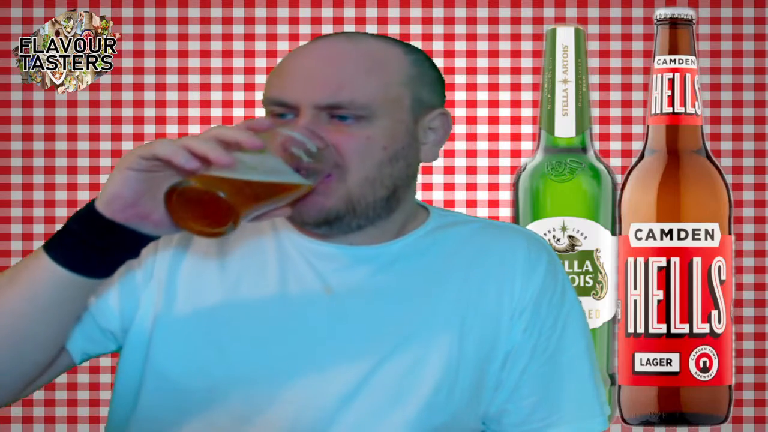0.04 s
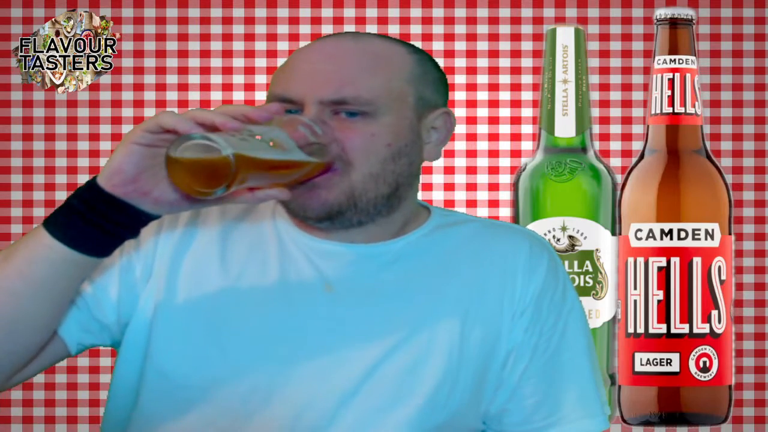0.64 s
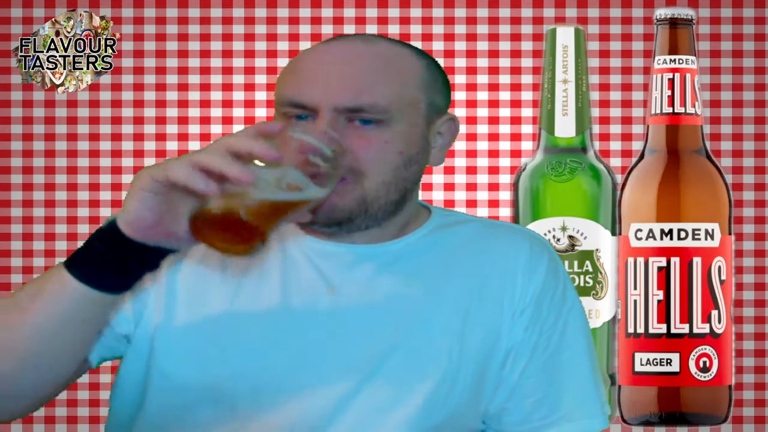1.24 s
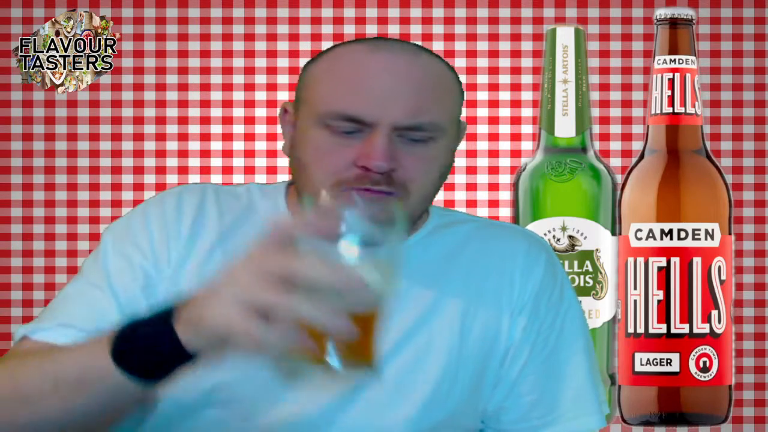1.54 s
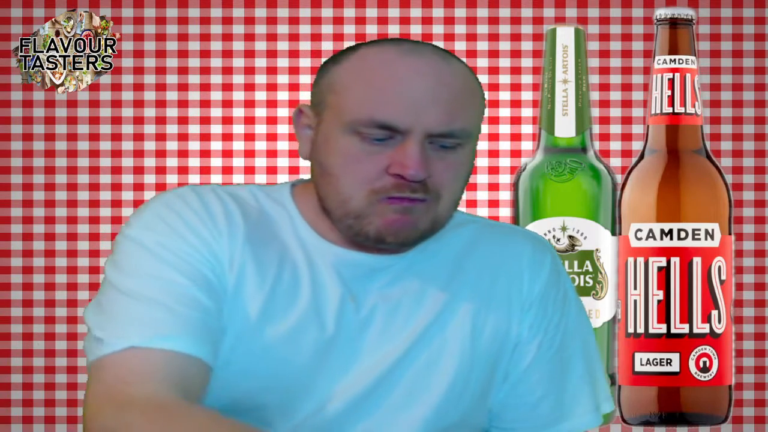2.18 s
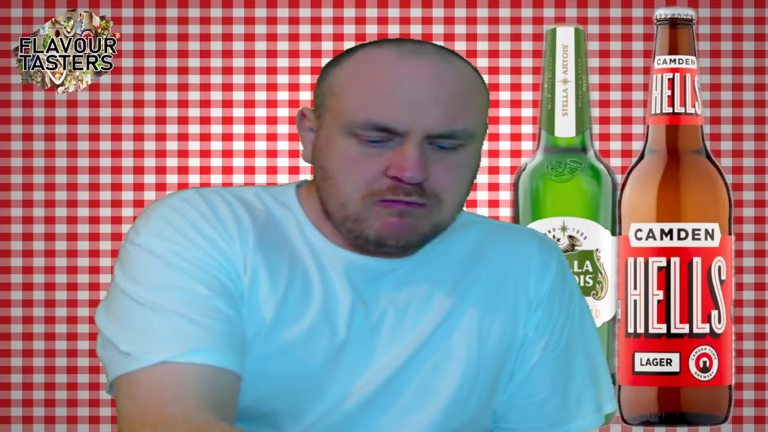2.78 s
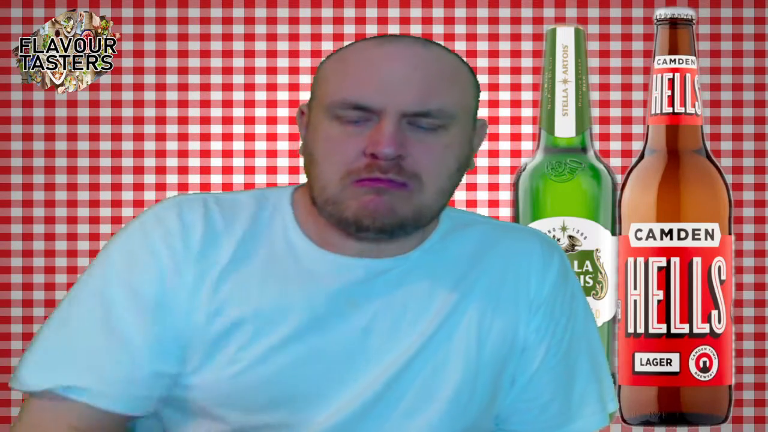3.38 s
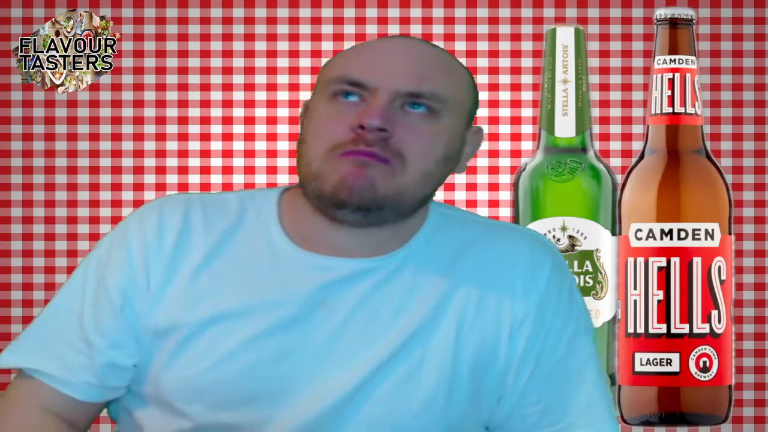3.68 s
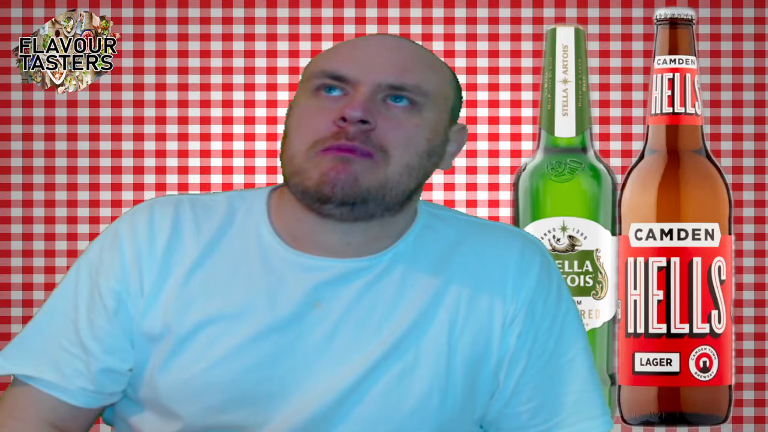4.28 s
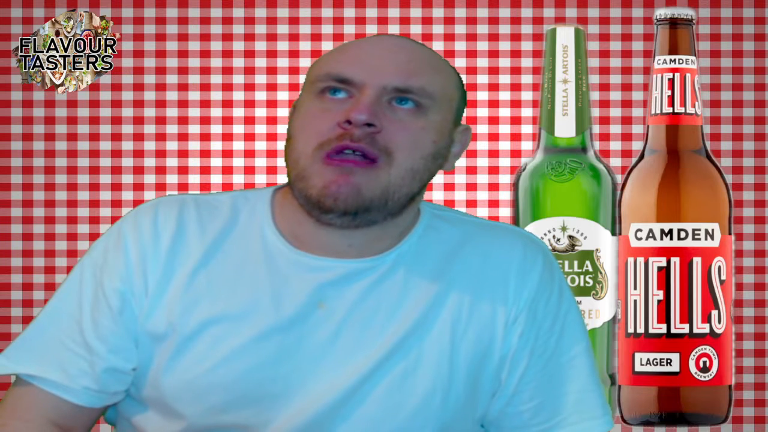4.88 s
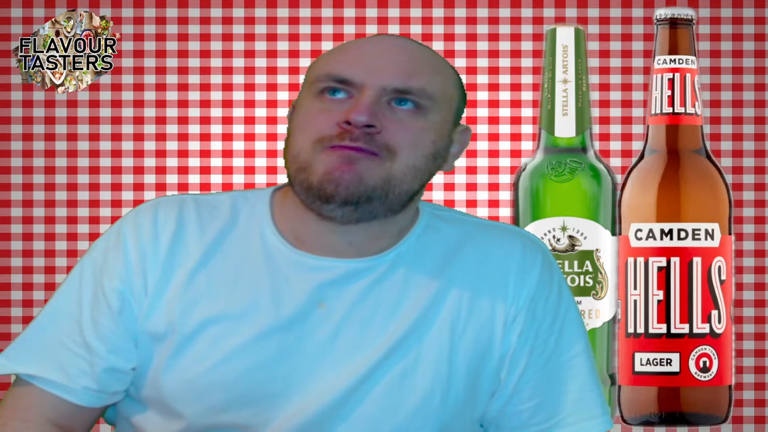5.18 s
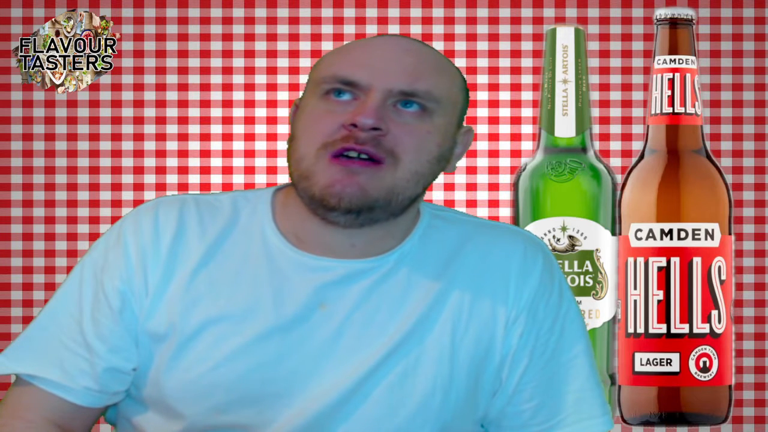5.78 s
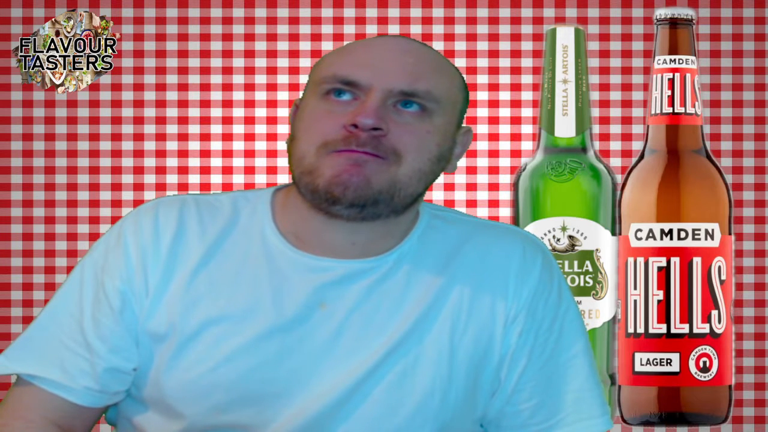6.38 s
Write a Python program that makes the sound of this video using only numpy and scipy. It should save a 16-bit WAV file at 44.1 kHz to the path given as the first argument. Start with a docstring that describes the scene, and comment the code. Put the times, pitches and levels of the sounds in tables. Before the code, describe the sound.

A drinking glass knocks down on a desk over a steady fan hum, followed by soft bumps and tiny lip smacks.

```python
"""A computer fan hums in a small room throughout, with a thin whine from the microphone's electronics.
Early on a faint low drone swells three times, the lips tick, and soft bumps touch the desk that carries
the microphone. At 2.7 s a part-filled drinking glass is set down: its base lands, slaps flat and rocks,
the glass rings briefly and the desk top booms on with a slow beat. The glass sings faintly as the fingers
slip off; more bumps and a sliding shirt follow, then tiny lip ticks and a few hollow pops."""
import sys
import numpy as np
from scipy import signal
from scipy.fft import irfft
from scipy.io import wavfile

SR = 44100
rng = np.random.default_rng(int(sys.argv[2]) if len(sys.argv) > 2 else 0)


def to_wav(s):
    """Save 16-bit WAV."""
    ch = np.atleast_2d(s).T  # columns
    pcm = np.round(np.clip(ch, -1, 1) * 32767)  # PCM
    wavfile.write(sys.argv[1], SR, pcm.astype(np.int16))


N = 283871
TIME = np.arange(N) / SR

# Air through the fan, over microphone hiss. Each row: frequency in Hz, relative density in dB.
FAN_AIR = [(25, 5.5), (65, -2.5), (100, -4), (145, 2.5), (205, -3.5), (285, 3.5), (370, -6.5), (490, -5),
           (1100, -17), (1600, -7), (2050, -13.5), (2600, -27), (3050, -29), (3600, -24), (4700, -30.5),
           (10000, -36), (16000, -38.5)]
# Fan and mains tones. Each row: frequency in Hz, rms level in dB.
FAN_TONES = [(36.8, -74.5), (87.3, -71.5), (119.8, -62.5), (144.3, -60), (175.5, -69.5), (218, -79),
             (252.1, -53.5), (260.5, -68), (286, -68.5), (756.3, -74), (1561, -83), (1750, -76.5)]
# Thin electrical whine. Each row: frequency in Hz, rms level in dB.
WHINE_TONES = [(1000, -82), (2000, -80.5), (3000, -99), (4000, -94), (5000, -97.5), (6000, -92.5),
               (8000, -97.5)]
# Contour of the electrical buzz. Each row: frequency in Hz, rms level of a harmonic there in dB.
BUZZ_CONTOUR = [(1000, -87), (1500, -80), (2100, -81), (2300, -87.5), (2500, -108), (3200, -108),
                (3550, -90), (3900, -101), (5000, -106)]
# Swells of the low drone. Each row: start and length in seconds, held rms level in dB, pitch in Hz.
DRONE_SWELLS = [(.23, 0.34, -57, 79), (.59, 0.37, -58, 77), (1.02, 0.34, -53.5, 80.5)]
# Wet ticks of the lips. Each row: start in seconds, level in dB, centre frequency in Hz.
LIP_TICKS = [(0.296, -68.5, 6530), (1.9662, -66, 5500), (4.872, -61.5, 4100), (5.4926, -57.5, 3870),
             (5.55, -59.5, 2900), (5.6768, -50.5, 8200), (5.712, -57, 5500), (5.7483, -57, 8240),
             (5.764, -66, 7500), (5.785, -65, 7500), (5.8147, -59, 2940)]
# Colour of one tick. Each row: ratio to its centre frequency, relative density in dB.
TICK_SPECTRUM = [(.25, -27), (.55, -13), (1, 2), (1.4, -15), (2, -12.5), (3, -26)]
# Soft bumps on the desk. Each row: start in seconds, strength in dB, brightness in Hz, boom gain in dB.
DESK_BUMPS = [(2.095, -26.5, 690, -50), (2.114, -42, 403, -38.5), (2.2546, -35.5, 9100, -49),
              (2.2591, -22, 724, -41), (2.281, -26, 600, -50), (2.8329, -31, 300, -18),
              (3.148, -30.5, 446, -30.5), (3.189, -26, 512, -52), (3.260, -17, 300, -30),
              (3.284, -20.5, 480, -50), (3.309, -23.5, 595, -42), (5.359, -30, 420, -36),
              (5.405, -30, 415, -46)]
# Ring of the hand-damped glass and the board under it.
# Each row: frequency in Hz, relative level in dB, time to fall 60 dB in seconds.
RING_MODES = [(386, -29, .1), (436, -29, .17), (542, -27, .19), (716, -29, .12), (800, -25, .13),
              (991, -30, .13), (1060, -23, .12), (1129, -33, .22), (1212, -30, .13), (1400, -20, .115),
              (1531, -30, .18), (1567, -26, .11), (1644, -23, .11), (1850, -30, .11), (2000, -24, .09),
              (2319, -30, .16), (2412, -33, .14), (2659, -35, .16), (2780, -33, .12), (3380, -40, .12),
              (3950, -42, .12), (5175, -43, .12), (6400, -49, .13), (7675, -52, .14)]
# Bending modes of the desk top and what stands on it.
# Each row: frequency in Hz, relative level in dB, time to fall 60 dB in seconds.
DESK_MODES = [(47.4, -33, 0.96), (58, -19, 0.12), (72.66, -20.5, 0.75), (80.4, -22, 0.7),
              (96.4, -27.5, 0.67), (130.5, -33.5, 0.48), (140.5, -22.5, 0.582), (140.7, -14.5, 0.13),
              (156, -19, 0.25), (282.5, -27, 0.13)]
# Dense, short-lived modes between the ringing ones. Each row: frequency in Hz, relative density in dB.
CRACK_SPECTRUM = [(150, -1), (300, 3), (520, 5.5), (900, -1), (1600, 1.5), (2400, -2.5), (3200, -11.5),
                  (4100, -11.5), (4700, -21.5), (7500, -18), (10500, -35), (16000, -55)]
# The glass base lands, slaps and rocks. Each row: start in seconds, strength in dB, brightness in Hz.
GLASS_CONTACTS = [(2.7122, 0, 900), (2.7146, 1, 12000), (2.7208, -6, 11000)]
# Strokes of the shirt as the arm draws back, then small shifts.
# Each row: peak time in seconds, peak rms level in dB, rise and fall in seconds.
SHIRT_STROKES = [(3.53, -70, .26, .1), (3.55, -60, 0.022, 0.047), (3.625, -66, .03, 0.057),
                 (3.81, -69, 0.11, 0.094), (4.335, -71.5, .025, .04), (5.485, -67.5, 0.054, 0.043)]
# Hiss of rubbing cloth. Each row: frequency in Hz, relative density in dB.
CLOTH_SPECTRUM = [(1200, -17.5), (2800, -2.5), (3400, -8), (5800, -0.5), (8200, -3.5), (10500, -13),
                  (16000, -15)]
# Soft hollow pops. Each row: start in seconds, gain in dB.
HOLLOW_POPS = [(5.838, -59), (5.854, -47.5), (5.864, -48.5), (5.897, -51.5)]
# Resonances of a pop. Each row: frequency in Hz, relative level in dB, time to fall 60 dB in seconds.
POP_MODES = [(616, 3, 0.01), (1200, 3, 0.024), (2800, -13.5, 0.044)]
# Reverb of the small room. Each row: frequency in Hz, time to fall 60 dB in seconds.
ROOM_DECAY = [(150, 0.25), (500, 0.35), (1500, 0.33), (3000, 0.26), (7000, 0.25), (14000, 0.22)]


def from_db(db):
    """Decibels to gain."""
    return 10 ** (np.asarray(db) / 20)


def rms_one(x):
    """Scale to rms 1."""
    return x / np.sqrt(np.mean(x ** 2) + 1e-20)


def at_hz(points, hz):
    """Read a table on a log-frequency axis."""
    known_hz, values = np.transpose(points)
    return np.interp(np.log(np.maximum(hz, 1)), np.log(known_hz), values)


def noise(spectrum, size=N):
    """Noise of a given colour, rms 1."""
    hz = np.arange(size // 2 + 1) * SR / size
    phasors = np.exp(2j * np.pi * rng.random(len(hz)))
    return rms_one(irfft(phasors * from_db(at_hz(spectrum, hz)), size))


def drift(rate_hz):
    """A slow random wander, rms 1."""
    return rms_one(np.interp(TIME * rate_hz, np.arange(1024), rng.standard_normal(1024)))


def tone(hz, offset_cycles=0):
    """A sine as long as the scene, rms 1."""
    return rms_one(np.sin(2 * np.pi * (hz * TIME + offset_cycles)))


def decay(t60):
    """One second of an envelope that falls 60 dB in t60 seconds."""
    return np.exp(-np.log(1000) * TIME[:SR] / t60)


def swell(peak_s, rise_s, fall_s, roundness=1.3):
    """A rubbing stroke gathers speed, peaks at 1 and slows; roundness 1 is pointed, 2 a bell shape."""
    distance = np.maximum((peak_s - TIME) / rise_s, (TIME - peak_s) / fall_s)
    return np.exp(-np.minimum(np.abs(distance) ** roundness, 20))


def struck(modes):
    """Modes ring after a blow; neighbours swing against each other and beat."""
    return sum((-1) ** k * from_db(db) * np.sin(2 * np.pi * hz * TIME[:SR]) * decay(t60)
               for k, (hz, db, t60) in enumerate(modes))


def soften(x, bright_hz):
    """A softer contact lasts longer and loses its treble."""
    return signal.sosfilt(signal.butter(2, bright_hz, fs=SR, output="sos"), x + 1e-18)


def add(track, start_s, sound):
    """Mix a sound in at its cue."""
    start = round(start_s * SR)
    track[start:start + len(sound)] += sound[:N - start]


def room(x, wet_db, build_s):
    """Direct sound plus a diffuse tail that builds up and dies sooner in the treble."""
    edges_hz = np.geomspace(200, 16000, 10)
    tail = np.zeros(SR)
    for low, high in zip(edges_hz, edges_hz[1:]):
        bandpass = signal.butter(2, [low, high], "band", fs=SR, output="sos")
        band = signal.sosfilt(bandpass, rng.standard_normal(SR))
        tail += band * decay(at_hz(ROOM_DECAY, np.sqrt(low * high)))
    tail *= 1 - np.exp(-(TIME[:SR] / build_s) ** 2)
    reverb = signal.fftconvolve(x, rms_one(tail) / np.sqrt(SR))[:N]
    return x + from_db(wet_db) * reverb


def fan(air_db=-58.5, waver_db=0.3, wander_rad=0.2):
    """Fan and mains tones waver slightly over a bed of rushing air."""
    out = from_db(air_db) * noise(FAN_AIR)
    for hz, db in FAN_TONES:
        phase = 2 * np.pi * (hz * TIME + rng.random()) + wander_rad * drift(rate_hz=2.46)
        gain = from_db(db + waver_db * drift(rate_hz=4.9))
        out += gain * rms_one(np.sin(phase))
    return out


def whine(buzz_hz=100):
    """The microphone's electronics add faint steady tones and a thin buzz."""
    harmonics_hz = buzz_hz * np.arange(11, 45)
    buzz = [(hz, at_hz(BUZZ_CONTOUR, hz)) for hz in harmonics_hz if hz % 1000]   # whole kHz are the whine's
    return sum(from_db(db) * tone(hz, rng.random()) for hz, db in WHINE_TONES + buzz)


def drone(fade_s=0.084):
    """A faint low tone swells three times: each fades in, holds its pitch and fades out."""
    out = np.zeros(N)
    for start_s, length_s, db, hz in DRONE_SWELLS:
        inside_s = np.minimum(TIME - start_s, start_s + length_s - TIME)
        fade = np.clip(inside_s / fade_s, 0, 1)
        out += from_db(db) * fade * tone(hz)
    return out


def lip_ticks(t60=0.03):
    """Wet lips make tiny bright bursts of noise, each around its own pitch."""
    out = np.zeros(N)
    for start_s, db, centre_hz in LIP_TICKS:
        colour = [(ratio * centre_hz, level) for ratio, level in TICK_SPECTRUM]
        add(out, start_s, from_db(db) * noise(colour, size=SR) * decay(t60))
    return out


def crack(bright_hz, gain_db=-17, t60=0.076):
    """The attack of a contact: a mass of dense modes that die almost at once."""
    burst = noise(CRACK_SPECTRUM, size=SR) * decay(t60)
    return from_db(gain_db) * soften(burst, bright_hz)


def bumps(ring_db=-5):
    """Light touches on the desk: each a dull knock, a muffled ring and a low boom."""
    knocks, rings = np.zeros(N), np.zeros(N)
    ring, boom = struck(RING_MODES), struck(DESK_MODES)
    for start_s, db, bright_hz, boom_db in DESK_BUMPS:
        add(knocks, start_s, from_db(db) * crack(bright_hz))
        add(rings, start_s, from_db(db + ring_db) * soften(ring, bright_hz))
        add(rings, start_s, from_db(boom_db) * boom)
    return room(knocks, wet_db=-9.0, build_s=0.0045) + rings


def glass(ring_db=2.0, boom_db=0.8):
    """The edge of the base lands first, then the whole base slaps down and rocks once."""
    cracks = np.zeros(N)
    for start_s, db, bright_hz in GLASS_CONTACTS:
        add(cracks, start_s, from_db(db) * crack(bright_hz))
    out = room(cracks, wet_db=-9.0, build_s=0.0072)
    land_s, slap_s = GLASS_CONTACTS[0][0], GLASS_CONTACTS[1][0]
    add(out, land_s, from_db(boom_db) * struck(DESK_MODES))   # the weight arrives with the first touch
    add(out, slap_s, from_db(ring_db) * struck(RING_MODES))   # the hard slap sets the glass ringing
    return out


def finger_slip(level_db=-78.5):
    """Fingers slipping off the glass rub one of its modes into a brief, faint tone."""
    return from_db(level_db) * swell(peak_s=3.1, rise_s=0.025, fall_s=0.06) * tone(hz=2783)


def shirt():
    """Fine fibres rub into a smooth bright hiss; overlapping strokes add in power."""
    power = sum((from_db(db) * swell(peak_s, rise_s, fall_s)) ** 2
                for peak_s, db, rise_s, fall_s in SHIRT_STROKES)
    return np.sqrt(power) * noise(CLOTH_SPECTRUM)


def pops():
    """Soft hollow pops, each three resonances that die quickly."""
    out = np.zeros(N)
    for start_s, db in HOLLOW_POPS:
        add(out, start_s, from_db(db) * struck(POP_MODES))
    return out


def scene():
    """The mono mix: foley at the desk, ticks and pops in the room, and the background bed."""
    foley = glass() + bumps() + finger_slip() + shirt()
    ticks_and_pops = room(lip_ticks() + pops(), wet_db=-7.5, build_s=0.0038)
    bed = fan() + whine() + drone()
    return (foley + ticks_and_pops + bed)[None]


def record(dry, cutoff_hz=15800):
    """A steep low-pass takes off the very top."""
    return signal.sosfilt(signal.ellip(12, 0.1, 80, cutoff_hz, fs=SR, output="sos"), dry)


dry = scene()
out = record(dry)
to_wav(out)
```